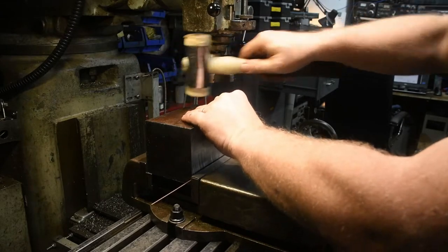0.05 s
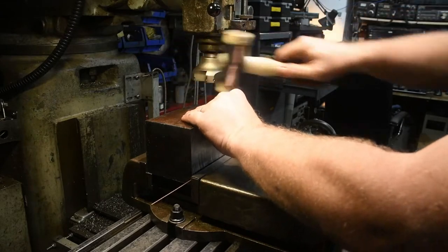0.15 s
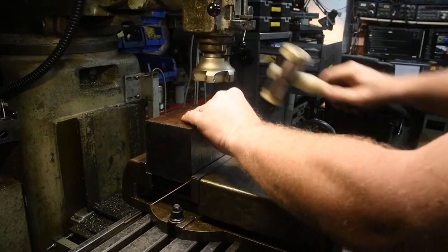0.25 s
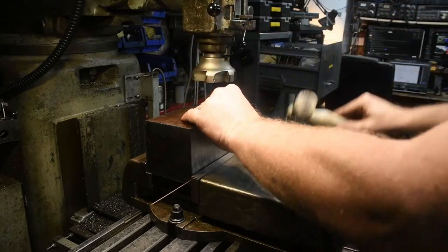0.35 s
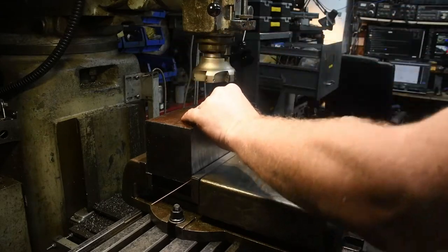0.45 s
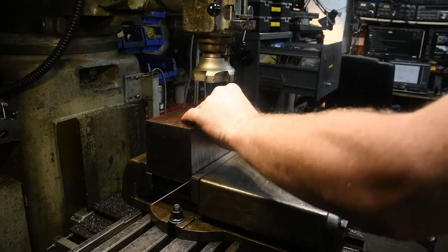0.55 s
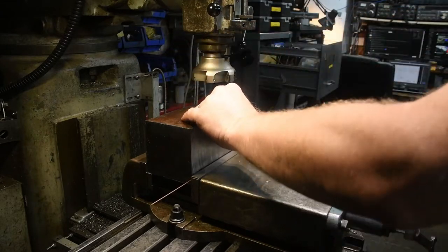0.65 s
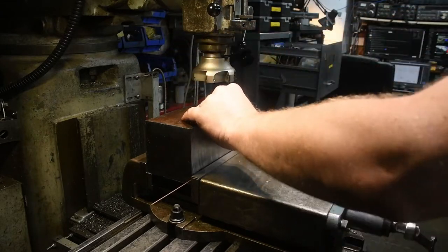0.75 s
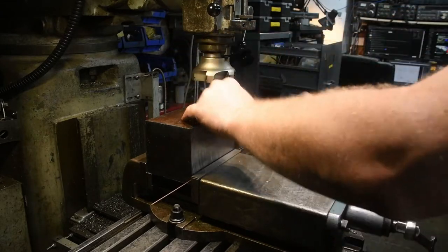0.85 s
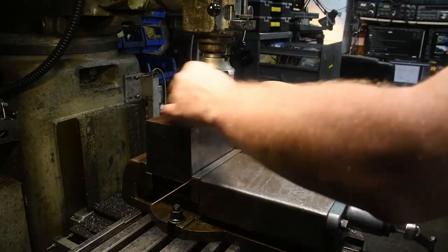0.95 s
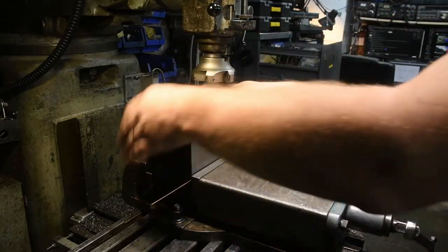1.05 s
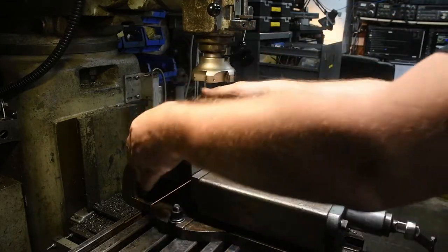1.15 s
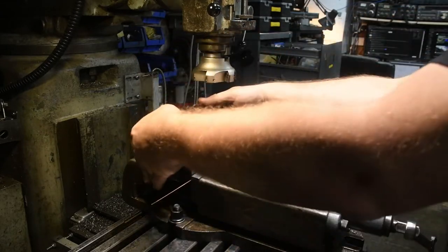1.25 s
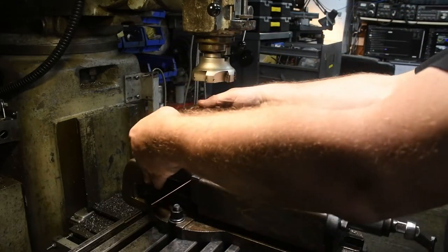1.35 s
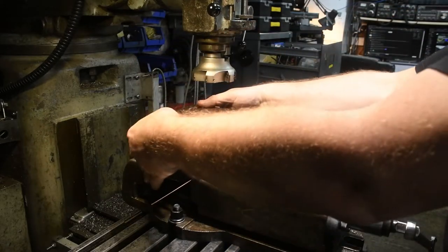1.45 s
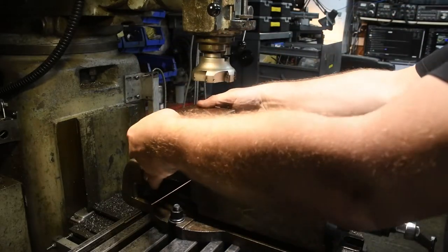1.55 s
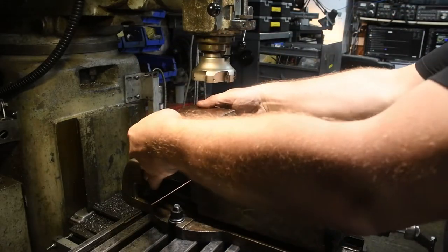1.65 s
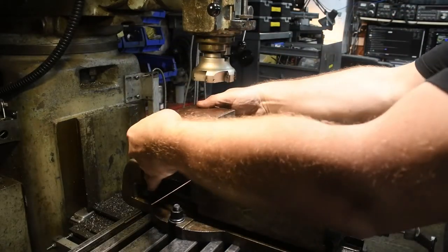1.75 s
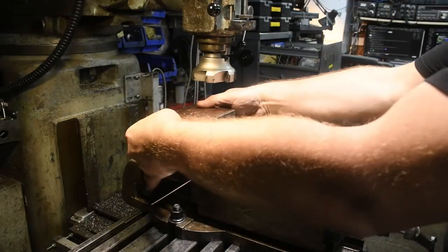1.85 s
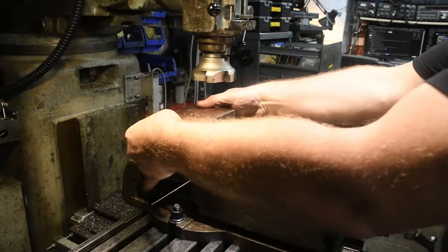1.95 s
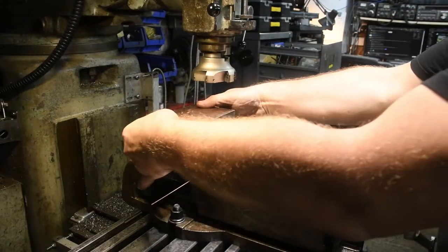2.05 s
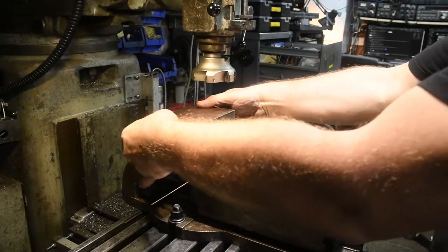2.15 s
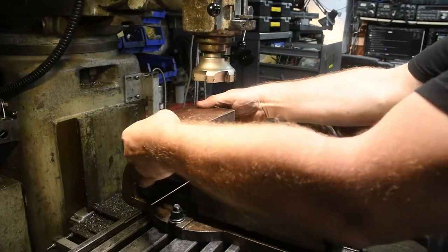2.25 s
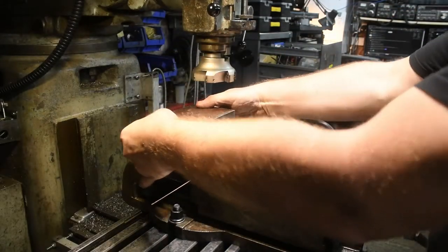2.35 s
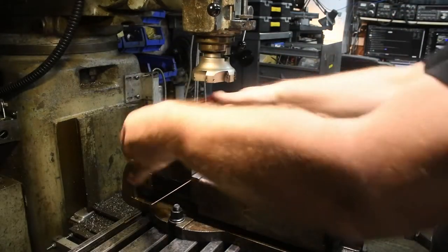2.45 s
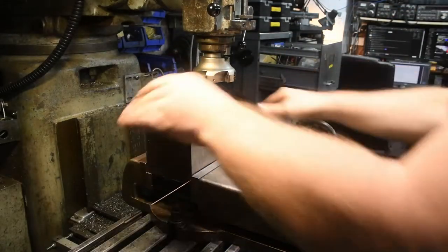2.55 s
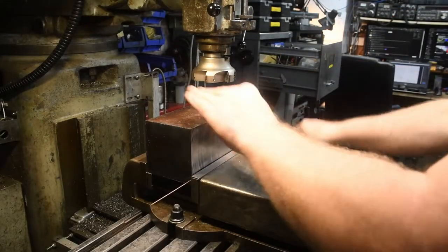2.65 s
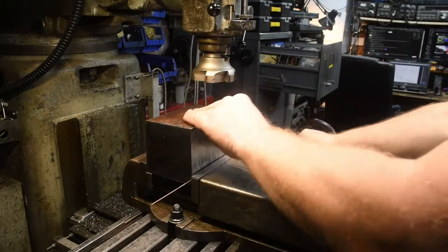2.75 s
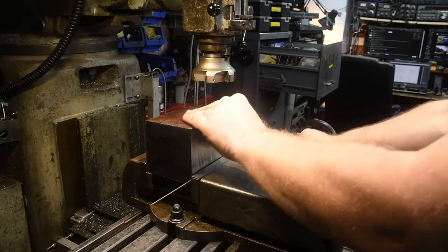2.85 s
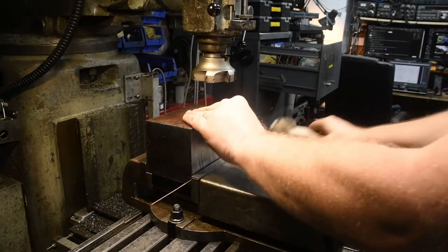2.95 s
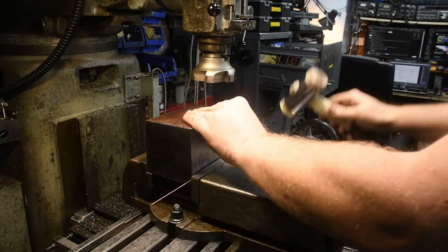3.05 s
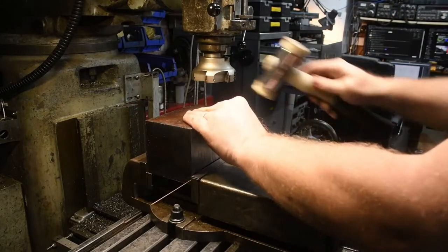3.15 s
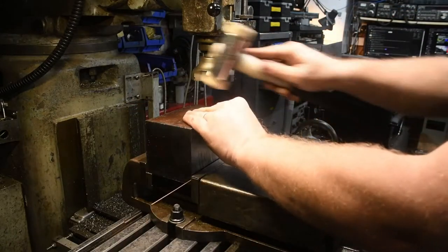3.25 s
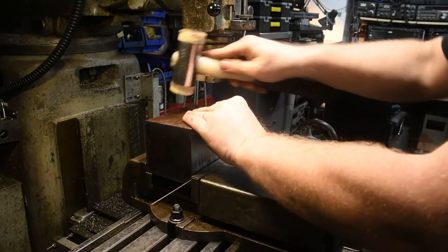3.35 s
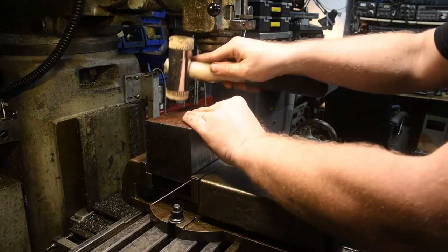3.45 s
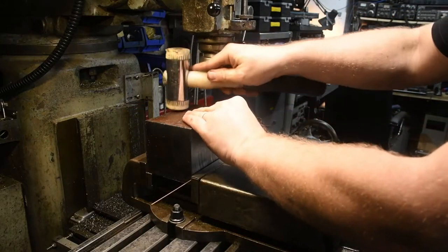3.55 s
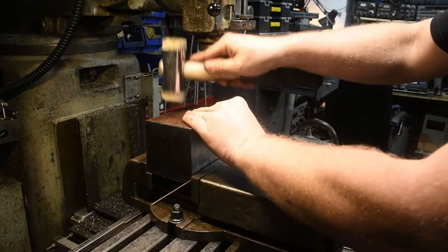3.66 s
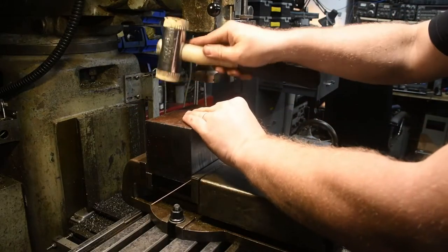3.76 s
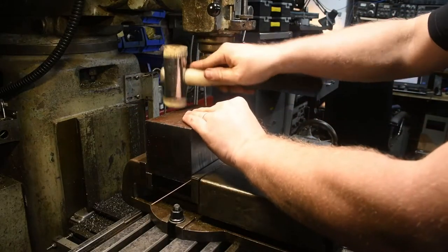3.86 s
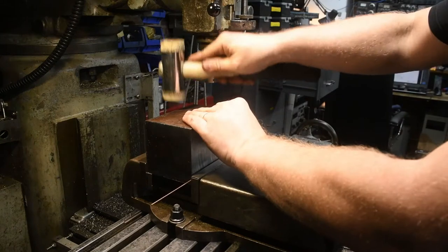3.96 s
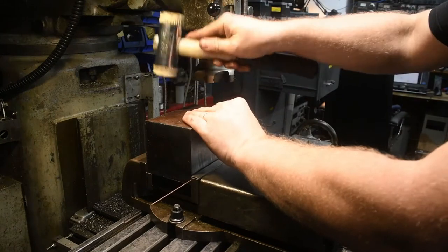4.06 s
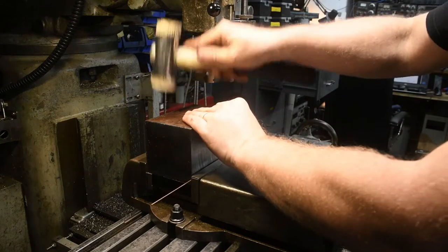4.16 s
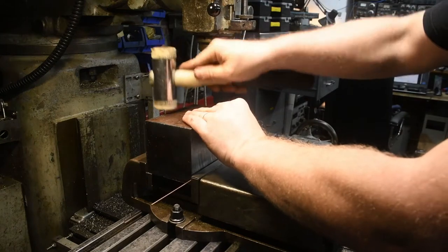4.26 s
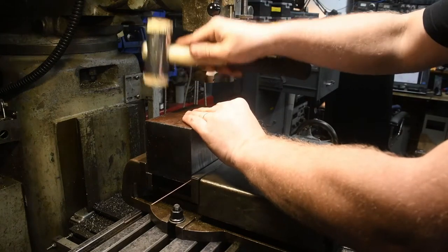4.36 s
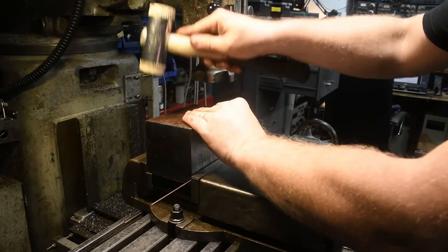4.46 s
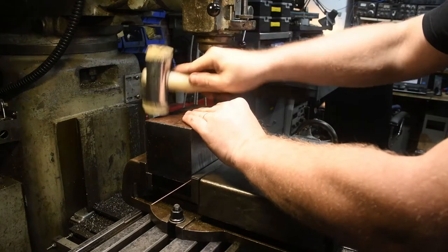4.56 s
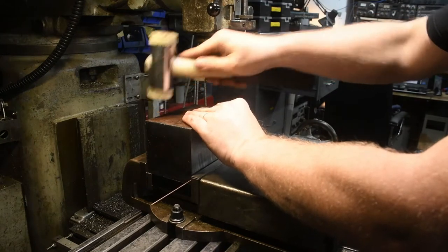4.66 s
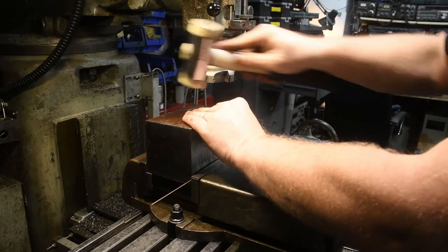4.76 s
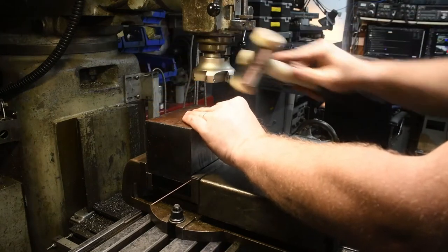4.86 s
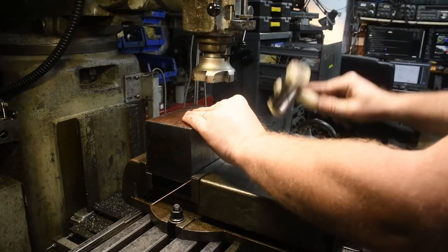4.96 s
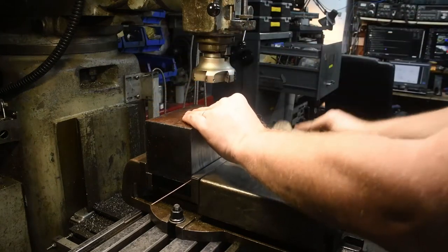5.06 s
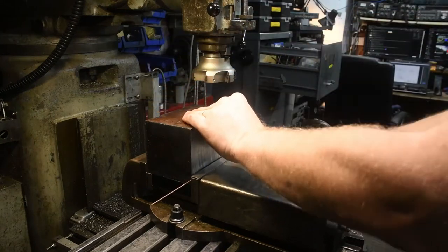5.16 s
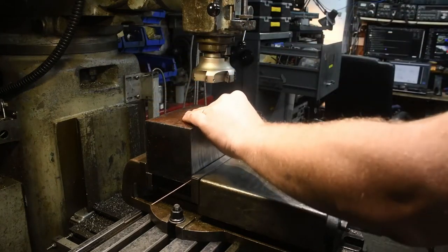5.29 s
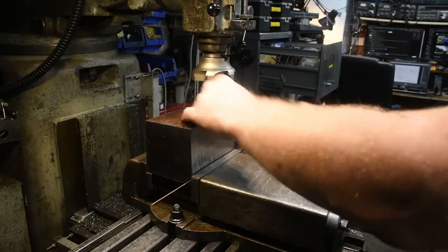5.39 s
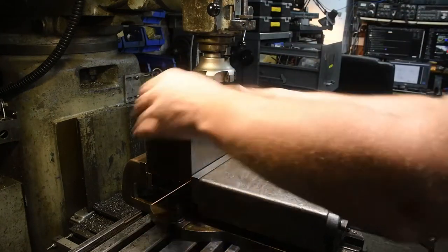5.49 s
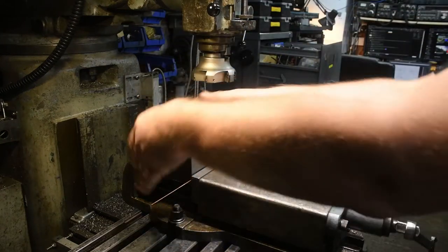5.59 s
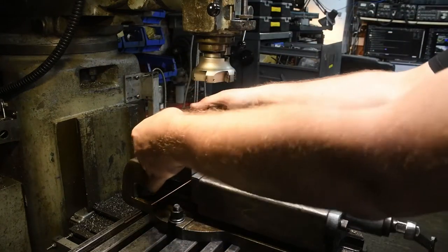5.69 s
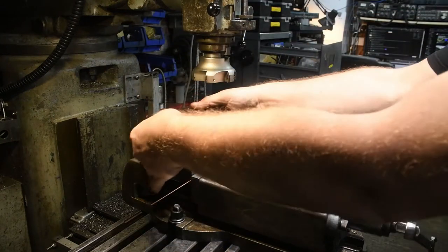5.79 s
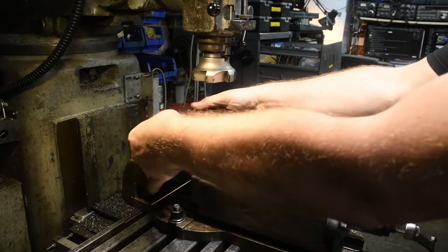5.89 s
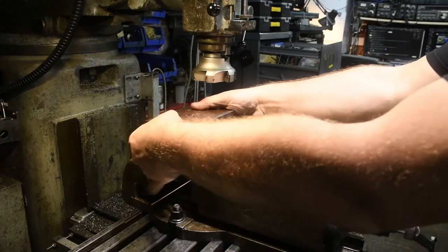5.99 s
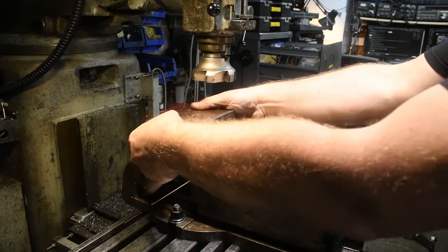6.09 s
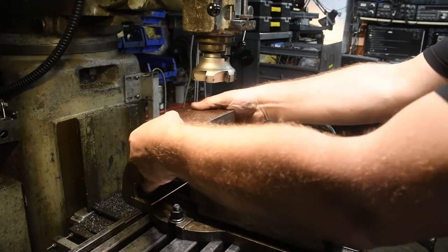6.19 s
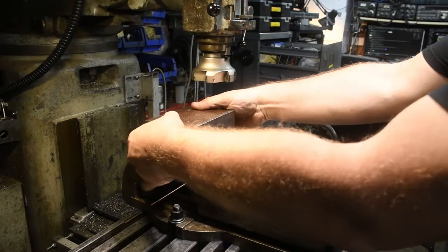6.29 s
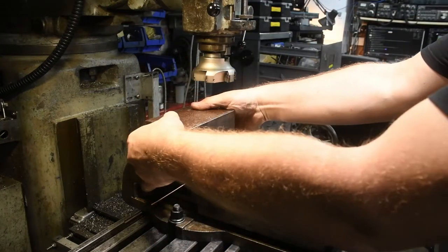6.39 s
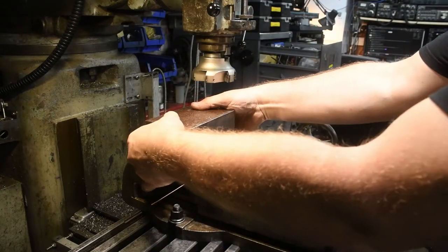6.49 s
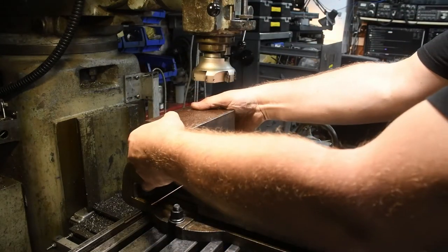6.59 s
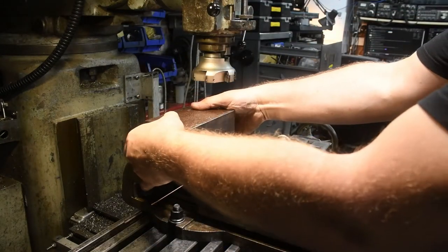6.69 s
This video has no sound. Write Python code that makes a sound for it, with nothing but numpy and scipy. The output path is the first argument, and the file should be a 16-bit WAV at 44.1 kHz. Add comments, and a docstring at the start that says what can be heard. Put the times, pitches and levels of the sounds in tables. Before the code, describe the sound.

A faint fan hum runs throughout in a small, dry workshop, with the work heard close up in stereo. The ringing tail of a mallet blow on steel fades at the start. Around 0.5 seconds the mallet is set down with two soft, dull knocks, and at 0.75 a loose vise handle clanks and bounces twice. Hands brush faintly over steel from about 1 to 3 seconds. At 3.6 the soft-faced mallet taps the steel block lightly, then strikes hard at 3.85, 4.2 and 4.55 seconds, the last blow loudest. Each hard knock has a sharp steel clack and a short ring through block, vise and machine table. At about 5.2 the mallet is laid on the machine with a few dull knocks, and the handle clanks and bounces again at 5.3. A faint brush of skin on steel follows near 5.7, leaving only the hum.

```python
"""A small, dry workshop, with a stereo pair close to the vise of a milling machine and a fan humming behind.
A soft-faced mallet seats a steel block: one light tap, then three hard knocks that ring block, vise and
table together while steel clacks on steel. The scene opens on the tail of an earlier blow.
After that blow and after the last, the mallet is laid on the machine and the loose vise handle clanks.
Hands brush over the steel with a faint hiss."""
import sys
import numpy as np
from scipy import signal
from scipy.fft import rfft, irfft, next_fast_len
from scipy.io import wavfile
from scipy.ndimage import uniform_filter1d, minimum_filter1d

SR = 44100
rng = np.random.default_rng(int(sys.argv[2]) if len(sys.argv) > 2 else 0)


def waveform_to_disk(signal):
    """Save audio, clipped to [-1, 1], as 16-bit WAV at the path in sys.argv[1]."""
    frames = np.transpose(np.atleast_2d(signal))
    scaled = np.clip(frames, -1, 1) * 32767
    samples = np.round(scaled).astype(np.int16)
    wavfile.write(sys.argv[1], SR, samples)


N = 296793
AGE = np.arange(2 ** 15) / SR   # seconds since a strike

# decay of the workshop: f/Hz, t60/s
ROOM_DECAY = [(60, 0.41), (115, 0.44), (200, 0.4), (500, 0.27), (1200, .22), (2500, 0.22), (5000, 0.19),
              (9000, .18), (16000, .15)]
# stereo width at the pair, for close sounds and for the fan's air: f/Hz, side re mid/dB
CLOSE_WIDTH = [(60, -20), (300, -19), (700, -14), (1400, -10.5), (2600, -3.5), (5000, -2), (15000, -.5)]
AIR_WIDTH = [(60, -9.5), (180, -15), (550, -6), (1650, -3), (4970, 1.5), (15000, 0.5)]
# fan and motor tones: f/Hz, level of the steady part/dB rms, flutter depth/0-1
FAN_TONES = [(122.6, -83.5, 0), (208.6, -66.5, 0.7), (301, -83, .6), (415, -79.5, 0), (657, -83.5, 0),
             (733, -86.5, 0.4), (676, -78, 0), (1258.4, -89.5, 0.5), (2300, -91.5, .3)]
# spectra of moving air and of skin on steel: f/Hz, relative density/dB
AIR_SPECTRUM = [(15, -19), (50, -10.5), (100, -16.5), (170, -17), (215, -8.5), (260, -16.5), (360, -22),
                (660, -18.5), (800, -21.5), (950, -29), (1150, -26.5), (1500, -31.5), (5200, -40),
                (10000, -41), (15000, -35.5)]
SKIN_HISS = [(1500, -16), (4000, -15), (7000, -11.5), (11000, -8), (15000, 0)]
SKIN_RASP = [(200, -0.5), (700, -2.5), (2000, -4.5), (4000, -7), (8000, -15.5), (15000, -29)]
# strokes of the hands: t at the fastest/s, level/dB, length/s, pressure/0-1
HAND_STROKES = [(0.938, -60, 0.1, 0.83), (1.148, -66, 0.19, 0.14), (2.05, -57.5, 0.069, 0.1),
                (2.425, -59.5, 0.064, .1), (2.511, -54, 0.04, 0), (2.787, -53.5, 0.042, 0.06),
                (3.15, -58.5, 0.12, .15), (3.47, -70, 0.37, .6), (4.76, -62.5, 0.085, 0.56),
                (5.278, -56, 0.088, 0.53), (5.404, -58, 0.097, 0.74), (5.684, -50.5, 0.093, 0.09)]
# falls of the vise handle: t/s, level/dB, first flight/s, second flight/share of the first,
# loss per bounce/dB, shaft ring/dB, hub ring/dB
HANDLE_DROPS = [(.7500, -34, .0788, 0.54, 2.5, -10.5, 0), (5.3310, -31, .0968, 0.87, 5, 2, -16)]
# clear modes of the handle's shaft and hub: f/Hz, level/dB, t60/s
SHAFT_MODES = [(578.6, -0.5, 0.31), (2080, 2, 0.11), (2125, -0.5, 0.23), (2202, 0.5, 0.13),
               (2310, 1, 0.055), (1700, -5.5, 0.21), (2680, -4.5, 0.082), (4630, -19.5, 0.14)]
HUB_MODES = [(743, -5.5, 0.15), (1113, -7.5, 0.2), (1321, 4, 0.094), (1400, -12, 0.25), (1450, -4, 0.15),
             (1750, 0.5, 0.15), (1784, -35, 0.15), (1800, -8.5, 0.24), (2050, -1, 0.059), (1980, -11, 0.07),
             (3230, -9, 0.068), (3380, -18, 0.23), (3450, -25, 0.16), (3850, -18, 0.11), (4320, -32, 0.11),
             (4620, -14, 0.067)]
# crowds of short-lived modes in handle, mallet and vise: f/Hz, relative density/dB
HANDLE_BODY = [(60, -18), (115, -2), (170, -9), (400, -9), (620, 4), (950, -4.5), (1400, 5.5), (2000, 3.5),
               (2450, -13), (3300, -5.5), (4700, -17), (6000, -22), (10000, -30), (15500, -23)]
MALLET_BODY = [(60, -39), (130, -18), (300, -16), (520, -3), (800, 2), (1300, 11.5), (1800, 9.5),
               (2500, -4.5), (3600, -3), (6000, -12), (10000, -16), (15500, 0)]
VISE_BODY = [(30, -27.5), (100, -22), (220, -15.5), (350, -2.5), (700, -3.5), (1150, 1), (1900, -7.5),
             (3000, -10.5), (6000, -13.5), (8000, -19.5), (12000, -26), (15500, -16)]
# the mallet's soft face meeting steel, low thud and bright snap: f/Hz, relative density/dB
FACE_THUD = [(60, -13), (115, 0), (160, -9.5), (240, -1), (520, 4.5), (800, -2), (1500, -36), (4000, -34.5)]
FACE_SNAP = [(500, -22), (2500, -5.5), (6000, -3), (9000, -1), (12000, -6), (15500, 0)]
# mallet laid down, head and shaft landing in turn: t/s, knock level/dB, thud level/dB
MALLET_LANDINGS = [(0.5196, -49, -41.5), (0.6218, -43, -43.5), (5.1530, -30, -45), (5.178, -32, -43),
                   (5.253, -48.5, -47)]
# lingering tones, a low boom of the room and two long rings of the machine: f/Hz, level/dB, t60/s
LINGERING_TONES = [(104.63, -19, 0.54), (536.4, 1, 0.64), (1203, -6, 0.4)]
# high modes of the steel block: f/Hz, level/dB, t60/s
BLOCK_MODES = [(3070, -1, .13), (4720, -2.5, 0.11), (4960, -10, .12), (5490, -8.5, 0.13), (6860, -5.5, .11),
               (8325, -6.5, .12), (8460, -7, .11), (9000, -7, 0.12), (9340, -6, 0.13)]
# block, vise and machine table ringing together: f/Hz, level/dB, t60/s
VISE_MODES = [(305, -22, 0.064), (381.5, -11, 0.2), (415, -13.5, 0.15), (523, -13.5, 0.15),
              (588, -18.5, 0.22), (630, -14, .18), (672, -11, 0.2), (697, -13, 0.27), (735, -12, 0.28),
              (829, -13.5, 0.22), (907, -10.5, .17), (959, -11.5, 0.16), (1077, -9, 0.17),
              (1106, -15, 0.14), (1165, -12.5, 0.17), (1258, -7.5, 0.084), (1280, -13, .18),
              (1544, -10.5, 0.18), (1941, -14.5, 0.19), (2320, -25.5, .14), (2400, -20.5, 0.2)]
# light steel contacts: t/s, level/dB, f/Hz
STEEL_TICKS = [(3.764, -66.5, 10100), (4.4162, -51, 5260)]
# mallet on the block: t/s, force/dB, spot/0 (centre) to 1 (edge), clack re the blow/dB, clack f/Hz
BLOWS = [(-.1, -17.5, .88, -19, 3820), (3.5589, -24, 0.17, -25.5, 4100), (3.8503, -11.5, 0.38, -7.5, 4900),
         (4.2162, -12.5, 0.58, -14.5, 5600), (4.5498, -8, .68, -4, 8726)]


def amp(db):
    """Decibels to gain."""
    return 10 ** (np.asarray(db) / 20)


def at_hz(points, hz):
    """Read a table on a log-frequency axis."""
    known, values = np.transpose(points)
    return np.interp(np.log(np.maximum(hz, 1)), np.log(known), values)


def add(out, s, sound):
    """Mix a sound in from time s."""
    start = round(s * SR)
    first, last = np.clip([start, start + sound.shape[1]], 0, N)
    out[:, first:last] += sound[:, first - start:last - start]


def drift(rate_hz):
    """A random wander with a spread near 1."""
    steps = np.arange(N) / SR * rate_hz
    return np.interp(steps, np.arange(4096), rng.standard_normal(4096))


def noise(spectrum, size, width=CLOSE_WIDTH):
    """Coloured noise of rms 1, alike at both microphones in the bass and wider in the treble."""
    length = next_fast_len(size)
    hz = np.fft.rfftfreq(length, 1 / SR)
    mid, side = np.exp(2j * np.pi * rng.random((2, len(hz)))) * amp(at_hz(spectrum, hz))
    pair = irfft(mid + side * amp(at_hz(width, hz)) * [[1], [-1]], length)[:, :size]
    return pair / pair.std()


def knock(spectrum, crack_db, crack_s):
    """Dense modes: a short crack from the object, then the room dying away band by band."""
    hz = np.fft.rfftfreq(len(AGE), 1 / SR)
    band_position = at_hz([(centre, k) for k, (centre, _) in enumerate(ROOM_DECAY)], hz)
    dense = rfft(noise(spectrum, len(AGE)))
    out = np.zeros((2, len(AGE)))
    for k, (centre, t60) in enumerate(ROOM_DECAY):
        age = AGE[AGE < 1.5 * t60]
        band = irfft(dense * np.maximum(1 - abs(band_position - k), 0))[:, :len(age)]
        build_up = 1 - np.exp(-age * centre / .55)   # about half a cycle, so lows come later
        out[:, :len(age)] += band * amp(-60 * age / t60) * build_up
    return out * (1 + amp(crack_db) * np.exp(-AGE / crack_s))


def ring(modes, scatter_db, swell_s):
    """Clear modes, excited a little differently by each strike and offset in phase across the pair."""
    out = np.zeros((2, len(AGE)))
    for hz, db, t60 in modes:
        age = AGE[AGE < 1.5 * t60]
        skew = amp(at_hz(CLOSE_WIDTH, hz)) * rng.choice([-1, 1]) * np.array([[1], [-1]])
        phase = 2 * np.pi * (hz * age + rng.random()) + np.arctan(skew)
        struck_db = db + scatter_db * rng.standard_normal()
        out[:, :len(age)] += np.sin(phase) * amp(struck_db - 60 * age / t60)
    return out * (1 - np.exp(-AGE / swell_s))


def soften(x, cut_hz):
    """A longer contact excites less treble."""
    return signal.sosfilt(signal.butter(1, cut_hz, fs=SR, output="sos"), x)


def fan(air_db=-62.5):
    """Room tone: fan and motor hum, partly wavering, in a steady wash of air."""
    t = np.arange(N) / SR
    tones = 0
    for hz, db, depth in FAN_TONES:
        flutter = 1 + depth * (drift(16) + 1j * drift(13))   # in level and phase
        tones += np.sqrt(2) * amp(db) * np.real(flutter * np.exp(2j * np.pi * hz * t))
    return tones + amp(air_db) * noise(AIR_SPECTRUM, N, AIR_WIDTH)


def hands(rise_share=.48, rasp_db=6.5):
    """Skin slides over steel, swelling and fading: a fine uneven hiss, with a rasp under pressure."""
    t = np.arange(N) / SR
    hiss, rasp = 0, 0
    for s, db, length_s, pressure in HAND_STROKES:
        rise_s, fade_s = rise_share * length_s, (1 - rise_share) * length_s
        falloff = np.where(t < s, ((t - s) / rise_s) ** 2, (t - s) / fade_s)
        stroke = amp(db) * np.exp(-falloff.clip(max=60))
        hiss += stroke
        rasp += stroke * pressure * amp(rasp_db)
    friction = hiss * noise(SKIN_HISS, N) + rasp * noise(SKIN_RASP, N)
    grain = amp(3 * drift(270))
    return friction * grain


def vise_handle(settle_db=1):
    """The loose handle drops against its stop and bounces twice, weaker and duller each time."""
    out = np.zeros((2, N))
    for s, db, flight_s, share, loss_db, shaft_db, hub_db in HANDLE_DROPS:
        contacts = [(0, 0), (flight_s, loss_db), (flight_s * (1 + share), 2 * loss_db + settle_db)]
        for delay_s, lost_db in contacts:
            shaft = amp(shaft_db) * ring(SHAFT_MODES, scatter_db=.6, swell_s=.0025)
            hub = amp(hub_db) * ring(HUB_MODES, scatter_db=.8, swell_s=.001)
            rattle = knock(HANDLE_BODY, crack_db=-13, crack_s=.0014)
            cut_hz = 9500 * 2 ** (-.4 * lost_db)   # 0.4 octave duller per dB lost
            add(out, s + delay_s, amp(db - lost_db) * soften(shaft + hub + rattle, cut_hz))
    return out


def mallet_laid_down(octaves_per_db=.03):
    """The mallet lands on the machine: dull knocks without a clear ring, brighter when harder."""
    out = np.zeros((2, N))
    for s, db, thud_db in MALLET_LANDINGS:
        cut_hz = 9300 * 2 ** (octaves_per_db * db)
        shaft = soften(knock(MALLET_BODY, crack_db=-10, crack_s=.0037), cut_hz)
        thud = knock(FACE_THUD, crack_db=-14, crack_s=.0085)
        add(out, s, amp(db) * shaft + amp(thud_db) * thud)
    return out


def clack(pitch_hz, crack_db):
    """Steel meeting steel excites the block's high modes near one pitch."""
    shape = [(.2, -11.5), (.72, -12.5), (.92, -3.5), (1.06, -.5), (1.25, -13), (2, -18.5)]
    cluster = [(pitch_hz * ratio, db) for ratio, db in shape]
    modes = [(hz, db + at_hz(cluster, hz), t60) for hz, db, t60 in BLOCK_MODES]
    return ring(modes, scatter_db=.7, swell_s=.0005) + knock(cluster, crack_db, crack_s=.0046)


def steel_ticks():
    """Light steel contacts between the blows, with a sharp crack."""
    out = np.zeros((2, N))
    for s, db, pitch_hz in STEEL_TICKS:
        add(out, s, amp(db) * clack(pitch_hz, crack_db=9.5))
    return out


def lingering_tones(spot):
    """A centre blow drives the room's boom and the machine's lower ring, an edge blow its higher ring."""
    angle = spot * np.pi / 2
    centre_db, edge_db = 20 * np.log10([np.cos(angle), np.sin(angle)])
    modes = [(hz, db + (edge_db if hz > 1000 else centre_db), t60) for hz, db, t60 in LINGERING_TONES]
    return ring(modes, scatter_db=2, swell_s=.029)


def face_snap():
    """The instant of contact: a millisecond of treble, near the middle of the stereo image."""
    burst = noise(FACE_SNAP, size=512, width=[(1000, -8)])
    return burst * np.exp(-AGE[:512] / .0011)


def mallet_blows(firm_db=-17, octaves_per_db=.63, snap_loss_per_db=2.5):
    """Each blow rings the same vise; force sets its brightness, and hard ones slap the block home."""
    out = np.zeros((2, N))
    common_body = amp(-3.5) * knock(VISE_BODY, crack_db=-8.5, crack_s=.018)
    for s, db, spot, clack_db, clack_hz in BLOWS:
        # a firm blow squashes the soft face hard; less force means longer contact and a weaker snap
        shortfall_db = max(firm_db - db, 0)
        cut_hz = 10000 * 2 ** (-octaves_per_db * shortfall_db)
        snap_db = -2.5 - snap_loss_per_db * shortfall_db
        varying_body = amp(-6) * knock(VISE_BODY, crack_db=-2.5, crack_s=.008)   # new with each blow
        vise_ring = amp(1) * ring(VISE_MODES, scatter_db=.23, swell_s=.002)
        vise = soften(common_body + varying_body + vise_ring, cut_hz)
        block = amp(clack_db) * clack(clack_hz, crack_db=-4)
        add(out, s, amp(db) * (vise + block))
        add(out, s, amp(db + snap_db) * face_snap())
        # the soft face thuds alike, even on the lightest tap
        add(out, s, amp(-31.5) * knock(FACE_THUD, crack_db=1.5, crack_s=.0051))
        add(out, s, amp(db - 12.5) * soften(lingering_tones(spot), cut_hz))
    return out


def scene():
    """The work at the vise, close in front of the microphones, over the fan."""
    return mallet_blows() + steel_ticks() + mallet_laid_down() + vise_handle() + hands() + fan()


def limiter(x, ceiling_db, release_db_per_s):
    """Peaks over the ceiling pull the gain down at once; it recovers steadily."""
    peak_db = 20 * np.log10(np.abs(x).max(axis=0) + 1e-9)
    over_db = np.maximum(peak_db - ceiling_db, 0)
    recovery_db = release_db_per_s * np.arange(N) / SR
    reduction_db = np.maximum.accumulate(over_db + recovery_db) - recovery_db
    gain_db = uniform_filter1d(minimum_filter1d(-reduction_db, size=33), size=33)
    return x * amp(gain_db)


def record(dry):
    """The recorder limits the close, hard knocks, rounds their remaining peaks and cuts the top."""
    limited = limiter(dry, ceiling_db=-2.2, release_db_per_s=400)
    rounded = limited / (1 + (limited / .68) ** 6) ** (1 / 6)
    top_cut = signal.ellip(10, .1, 80, 15950, fs=SR, output="sos")
    return signal.sosfilt(top_cut, rounded)


dry = scene()
out = record(dry)
waveform_to_disk(out)
```